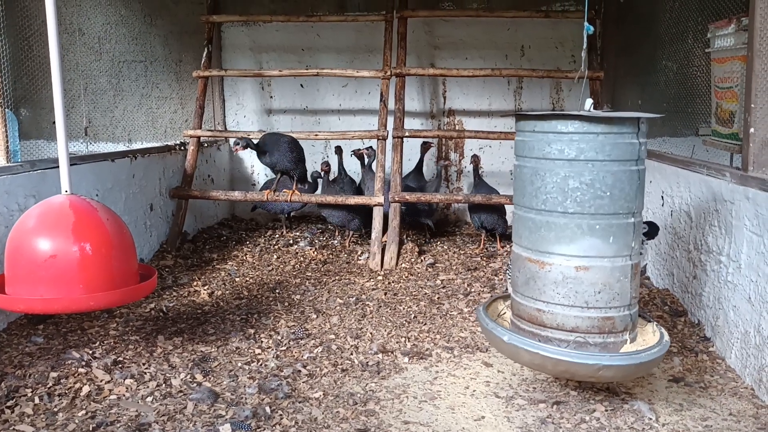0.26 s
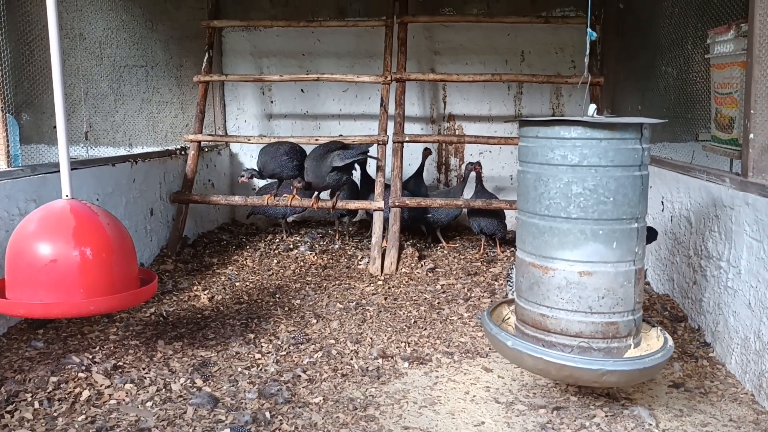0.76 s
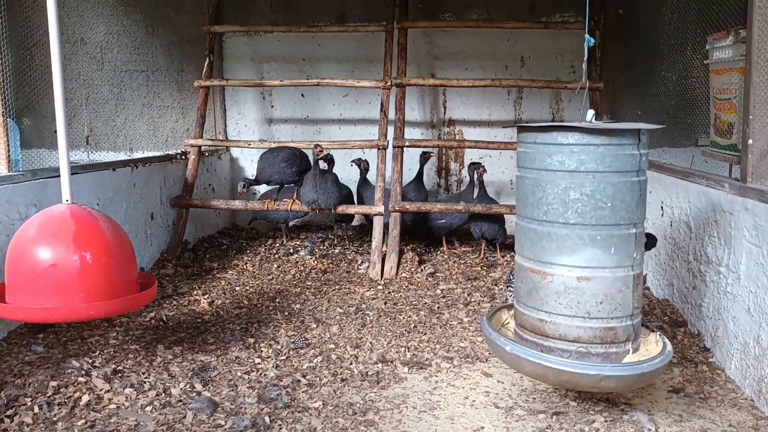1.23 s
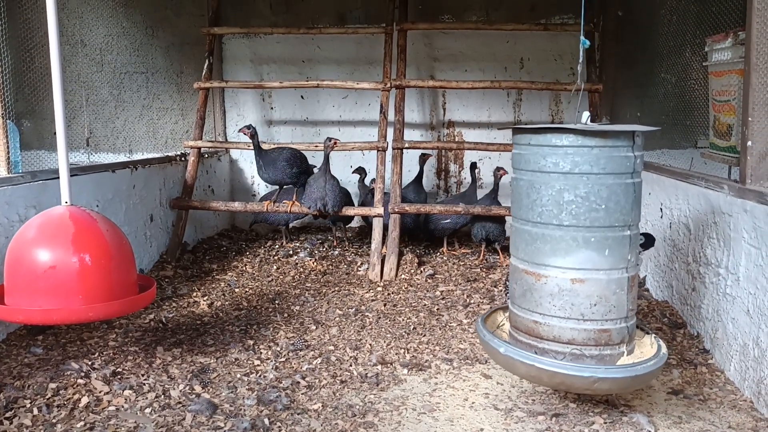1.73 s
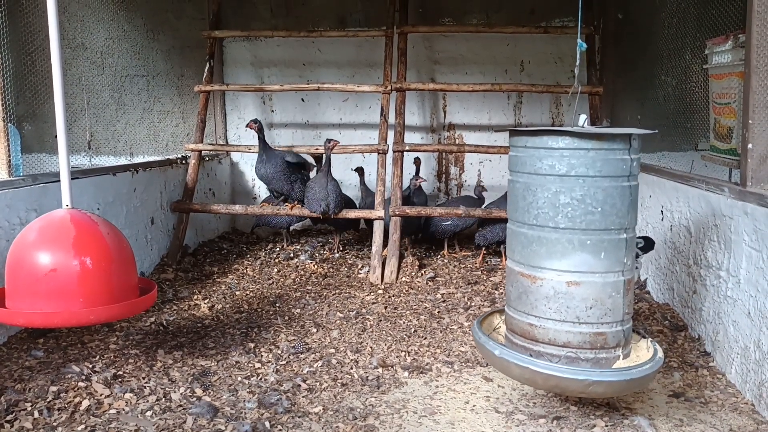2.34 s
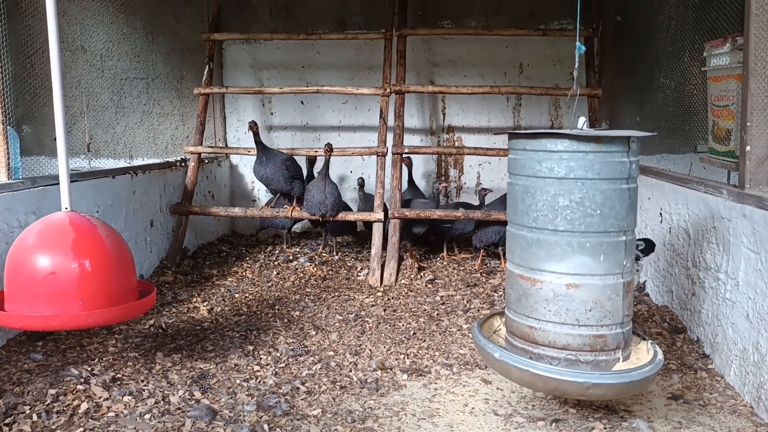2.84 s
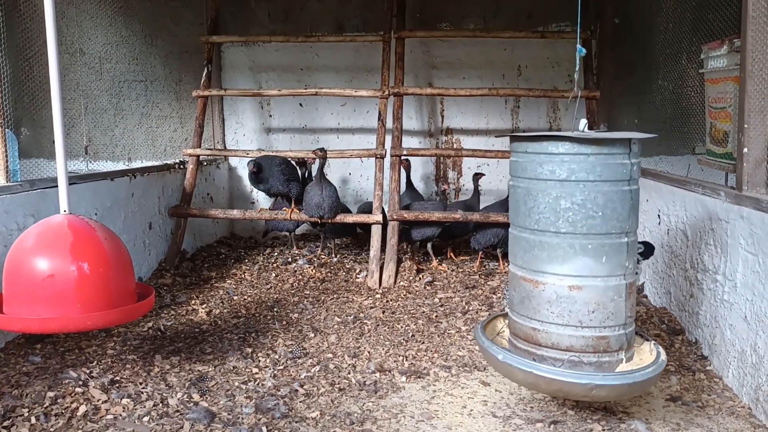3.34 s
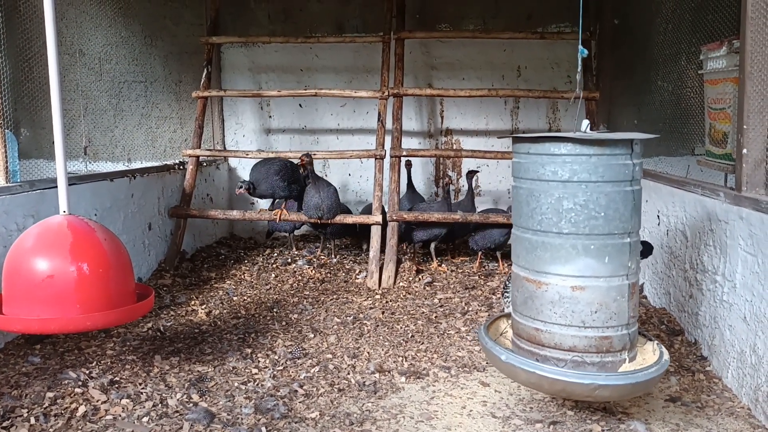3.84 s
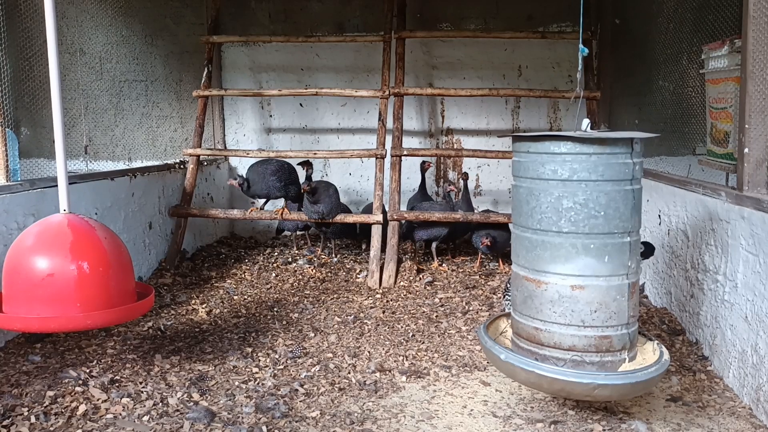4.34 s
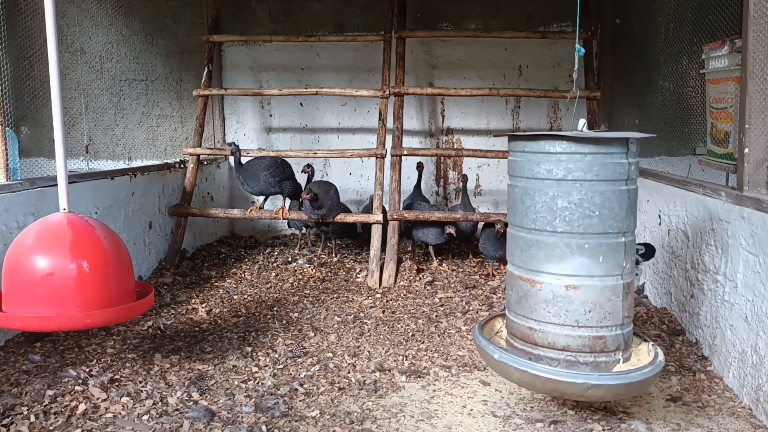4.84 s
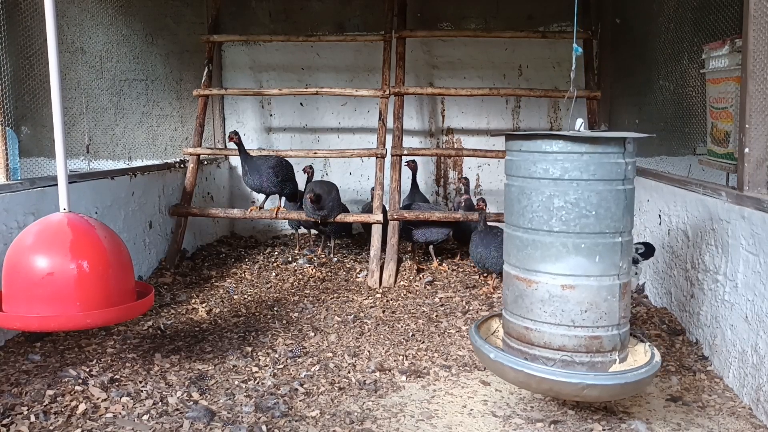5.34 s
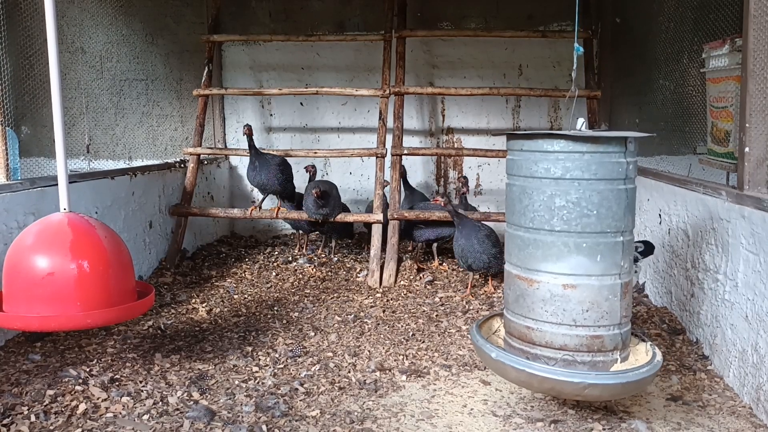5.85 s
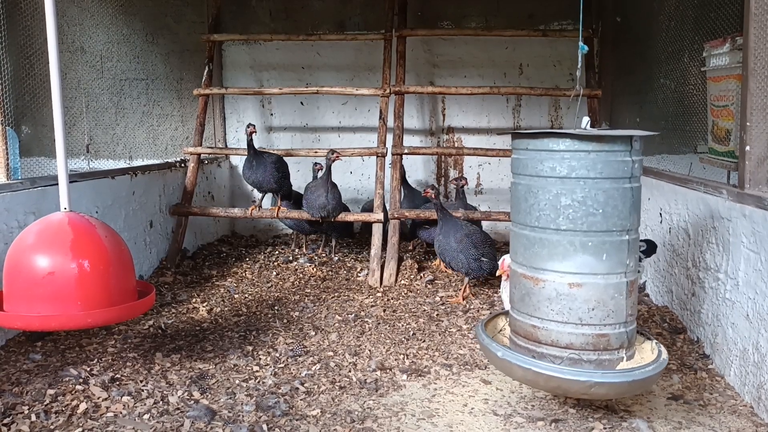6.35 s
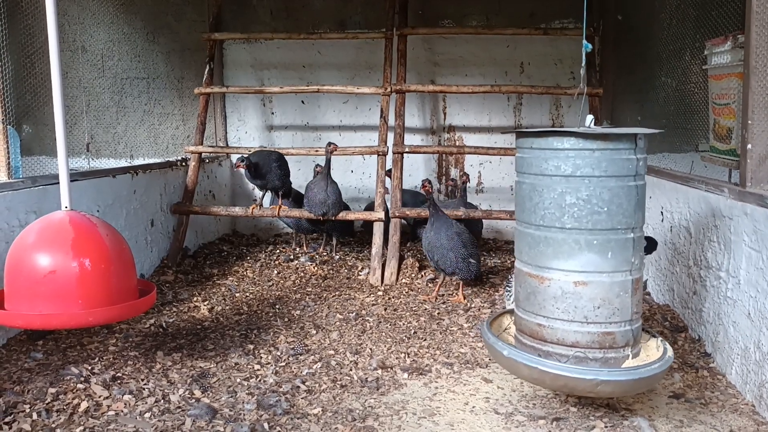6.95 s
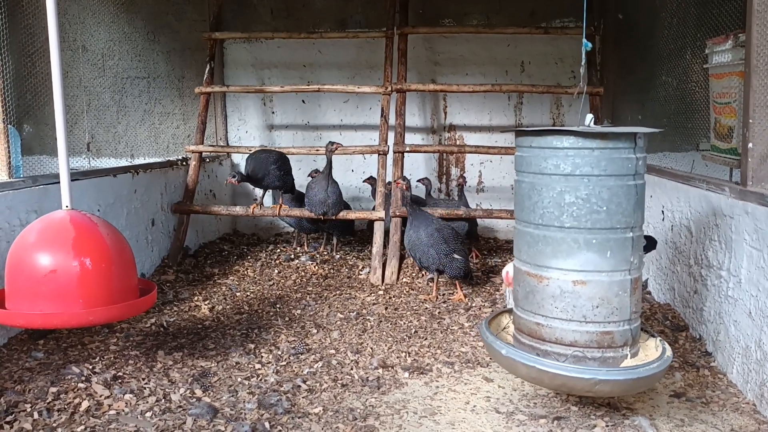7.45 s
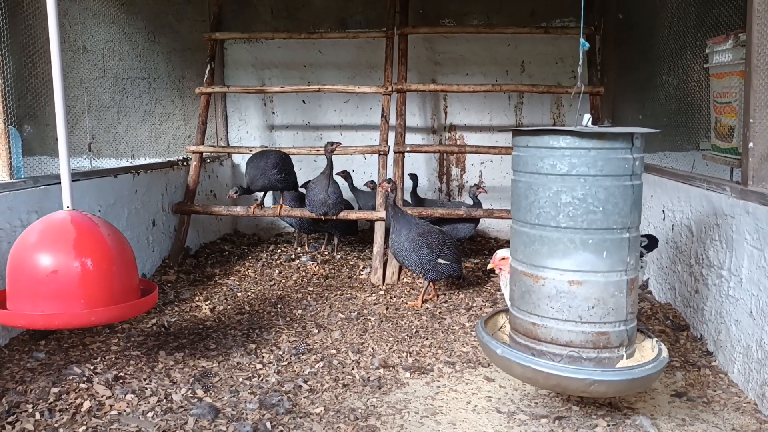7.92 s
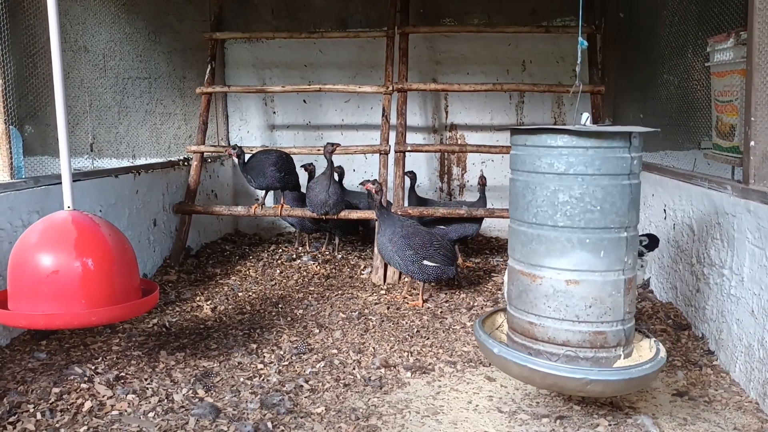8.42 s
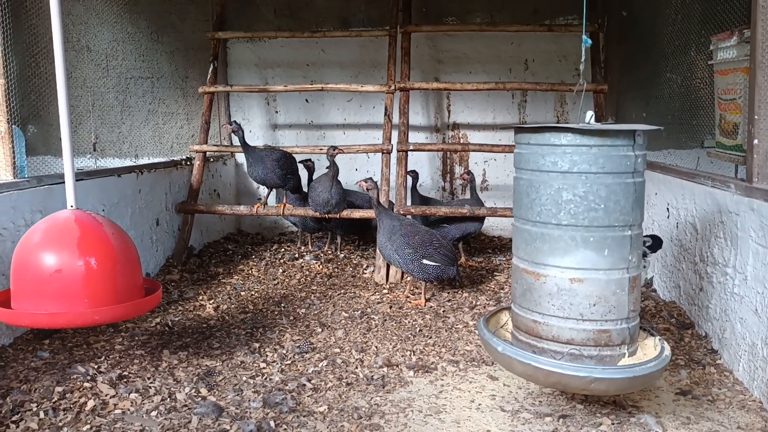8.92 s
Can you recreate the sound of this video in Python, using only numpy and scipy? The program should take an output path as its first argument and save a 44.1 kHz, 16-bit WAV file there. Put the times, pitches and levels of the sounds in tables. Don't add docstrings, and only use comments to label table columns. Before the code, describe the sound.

A flock of guineafowl rattles harsh, fast, overlapping calls in a small concrete shed, then stops, leaving a hen's soft clucks and thin bird peeps.

```python
import sys
import numpy as np
from scipy import signal
from scipy.fft import rfft, irfft, next_fast_len
from scipy.io import wavfile
from scipy.ndimage import uniform_filter1d, minimum_filter1d, map_coordinates

SR = 44100
rng = np.random.default_rng(int(sys.argv[2]) if len(sys.argv) > 2 else 0)


def boost_factor(decibels):
    exponent = np.asarray(decibels, float) / 20
    return 10 ** exponent


def store_wav(level_fs):
    pcm = np.round(np.clip(np.atleast_2d(level_fs), -1, 1) * 32767)
    wavfile.write(sys.argv[1], SR, pcm.T.astype(np.int16))


N = 404838
T = np.arange(N) / SR

# start_s [s], pitch_hz [Hz], fundamental_db [dB]
FLOCK_PITCH = [(0.0, 345.1, -46.5), (.6, 328.4, -50.5), (1.3, 336, -45), (1.75, 332.1, -49),
               (2.33, 331.6, -46.5), (2.47, 305.7, -45.5), (2.7, 324.3, -50.5), (3.5, 322.2, -49),
               (3.95, 338.7, -55.5), (4.1, 331.9, -56), (4.3, 337, -46.5), (4.45, 363.2, -40.5),
               (4.85, 360.9, -46), (5.2, 337.1, -44.5), (5.6, 341.2, -46), (7.9, 325.6, -48),
               (8.15, 316.1, -38), (8.35, 319, -70)]
# start_s [s], rasp_length_s [s], rasp_db [dB], whistle_db [dB], whistle_hz [Hz]
NEAR_CALLS = [(0.07, 0.048, -22, -37, 2550), (0.208, 0.12, -26.5, -32, 2940),
              (0.414, 0.1, -25.5, -21, 2660), (0.689, 0.09, -35, -17.5, 2430),
              (0.883, 0.05, -24.5, -18.5, 2448), (1.052, 0.028, -28.5, -30, 3040),
              (1.199, 0.12, -22, -15, 2800), (1.396, 0.046, -24, -22, 2430),
              (1.577, 0.037, -21.5, -15.5, 2410), (1.704, 0.32, -25, -19, 2710),
              (2.582, 0.096, -18, -18, 2950), (2.773, 0.107, -22, -26, 2240),
              (3.008, 0.069, -22.5, -34, 2134), (3.258, 0.074, -23.5, -19, 2080),
              (3.427, 0.046, -28, -18, 2516), (3.566, 0.1, -19.5, -14, 2515),
              (3.839, 0.13, -25.5, -45, 2388),
              (4.182, 0.089, -23.5, -23, 2250), (4.42, 0.042, -21.5, -19, 2287),
                (4.559, 0.085, -23.5, -21, 2212), (4.713, 0.044, -21.5, -22, 2180),
                (4.865, 0.12, -27, -15.5, 2617), (5.105, 0.043, -24.5, -15.5, 2558),
                (5.27, 0.051, -22.5, -17.5, 2355), (5.374, 0.22, -24, -23, 2560),
                (6.096, 0.096, -21.5, -23, 2523), (6.31, 0.074, -20, -23, 2556),
                (6.653, 0.052, -19.5, -26, 2750), (6.965, 0.09, -21, -19, 2477),
                (7.193, 0.049, -22, -25, 3140), (7.357, 0.038, -24.5, -21, 2514),
                (7.576, 0.056, -21, -26, 2550), (7.803, 0.027, -24.5, -23, 3040),
                (8.114, 0.045, -24.5, -39, 2454)]
CALLS = np.array(NEAR_CALLS)
# start_s [s], length_s [s], level_db [dB], hiss_db [dB]
NEIGHBOURS = [(0.0, 0.0071, -14.5, -19.5), (0.287, 0.07, -28.5, -18.5), (0.565, 0.16, -29.5, -17.5),
              (1.073, 0.018, -33, -2), (1.109, 0.031, -27, -17.5), (2.052, 0.25, -28.5, -11.5),
              (2.304, 0.041, -24, -15.5), (2.402, 0.045, -20, -14.5), (2.899, 0.035, -23, -15.5),
              (3.094, 0.044, -27, -19.5), (3.178, 0.038, -24.5, -14.5), (3.967, 0.039, -36.5, -2.5),
              (5.635, 0.18, -26, -17), (5.847, 0.0435, -23, -16.5), (6.513, 0.074, -21, -15.5),
              (6.756, 0.07, -19.5, -14.5), (7.66, 0.034, -35.5, -13)]
ATTACK_S = 0.0025


def unit(x):
    return x / np.sqrt(np.mean(x ** 2) + 1e-20)


def along(points, hz):
    f, v = np.transpose(points)
    return np.interp(np.log(hz + 1), np.log(f + 1), v)


def curves(rows):
    s, *cols = np.transpose(rows)
    return [np.interp(T, s, c) for c in cols]


def gate(start, length, rise, fall):
    return np.clip((T - start) / rise, 0, 1) * np.clip((start + length - T) / fall + 1, 0, 1)


def wobble(rate):
    return map_coordinates(rng.standard_normal(int(N * rate / SR) + 4), [T * rate])


def filtered(x, response):
    m = next_fast_len(N + 8192)
    return irfft(rfft(x, m) * response(np.fft.rfftfreq(m, 1 / SR)), m)[..., :N]


def tones(tables, overtones_db):
    out = np.zeros(N)
    for rows in tables:
        hz, *levels = curves(rows)
        turn = 2 * np.pi * np.cumsum(hz * (1 + 0.022 * wobble(60))) / SR
        levels += [levels[-1] + db for db in overtones_db]
        voice = sum(boost_factor(db) * np.sin((k + 1) * turn) for k, db in enumerate(levels))
        out += np.sqrt(2) * voice * gate(rows[0][0], rows[-1][0] - rows[0][0], 0.0088, 0.0023)
    return out


def near_birds():
    # hz [Hz], level_db [dB]
    beak = [(470, -63), (800, -27.5), (952, -15.5), (1540, -4.5), (1960, -13.5), (2540, -9), (3380, -6.5),
            (4380, -7.5), (5480, -21), (9600, -22), (12000, -32.5), (15600, -37)]
    hiss_split_hz, lead_s = 5500, 0.0058
    voice = filtered(syrinx(pitch(), rasp=0.45, jitter=0.018), lambda hz: boost_factor(along(beak, hz)))
    low_voice = filtered(voice, lambda hz: hz < hiss_split_hz)
    closing_hz = opening() + 550 * np.exp(-since_onset() / 0.03)
    body = restless(mouth(low_voice, closing_hz, width_hz=170, lift_db=12.5), patchy_db=2.6)
    breath = syrinx(pitch(), rasp=0.6, jitter=0.03)
    hiss = filtered(breath, lambda hz: boost_factor(along(beak, hz)) * (hz >= hiss_split_hz))
    hiss = restless(hiss, patchy_db=3.5)

    effort, airy = np.zeros(N), np.zeros(N)
    own_notes = [(s, length, db, -14) for s, length, db in CALLS[:, :3]]
    for s, length, db, hiss_db in own_notes + NEIGHBOURS:
        growth_db = 2 * 0.18 / length * np.clip((T - s) / length - 0.25, -1, 1)
        note = gate(s - lead_s, length, ATTACK_S, 0.00287) * boost_factor(db + 3.5 + growth_db)
        spit = 1 + 0.9 * np.exp(-np.abs(T - s + lead_s) / 0.012)
        effort += note
        airy += note * boost_factor(hiss_db - 0.4) * spit
    return (effort * body + airy * hiss) * clumps()


def syrinx(pitch_hz, rasp, jitter):
    cycles = np.cumsum(pitch_hz * (1 + jitter * wobble(120))) / SR
    pulses = np.diff(np.floor(cycles), prepend=0) * boost_factor(2.5 * wobble(250))
    breath = rng.standard_normal(N) * (0.88 + np.cos(2 * np.pi * cycles))
    rasp = np.clip(rasp, 0, 1)
    return np.sqrt(1 - rasp) * unit(pulses) + np.sqrt(rasp) * unit(breath)


def since_onset(answers=False):
    starts = np.sort(np.r_[-1, CALLS[:, 0], np.transpose(NEIGHBOURS)[0] if answers else []])
    return T - starts[np.searchsorted(starts, T) - 1]


def pitch():
    tension = 0.12 * np.exp(-since_onset() / 0.04)
    return curves(FLOCK_PITCH)[0] * (0.97 + tension + 0.02 * wobble(10))


def opening():
    # start_s [s], open_hz [Hz], closing_s [s]
    mouths = [(0.0, 1890, 0.15), (.205, 1925, 0.45), (.415, 2070, 0.093), (.56, 2025, 0.4),
              (.69, 1870, 0.19), (0.884, 2100, 0.033), (1.06, 2080, 0.14), (1.2, 2330, 0.082),
              (1.395, 2030, 0.083), (1.58, 1970, 0.098), (1.704, 2067, 0.76), (1.93, 1710, 0.43),
              (2.04, 2080, .12), (2.2, 1730, 0.78), (2.391, 1975, 0.57), (2.583, 1954, 0.18),
              (2.777, 2060, 0.087), (2.899, 2110, 0.13), (3.009, 2200, 0.037), (3.179, 1837, 0.32),
              (3.369, 1590, 0.54), (3.461, 1930, 0.056), (3.57, 1697, .2), (3.621, 2150, 0.052),
              (3.84, 2000, 0.17), (3.949, 2080, 0.58), (4.184, 1910, 0.12), (4.3, 1727, 0.16),
              (4.416, 2270, 0.03), (4.561, 2260, 0.048), (4.717, 2030, 0.12), (4.868, 1960, 0.09),
              (5.107, 2068, 0.11), (5.273, 1998, 0.046), (5.38, 2020, 1.3), (5.74, 1948, 0.041),
              (5.851, 1864, 0.088), (6.094, 2040, 0.26), (6.309, 2000, 0.081), (6.4, 1725, 0.77),
              (6.521, 1801, 0.19), (6.58, 1940, 0.58), (6.66, 2170, 0.66), (6.78, 2012, 0.055),
              (6.964, 2070, 0.47), (7.192, 2050, 0.041), (7.36, 1920, 0.079), (7.576, 1940, 0.73),
              (8.117, 2130, 0.27)]
    closed_hz = 1480
    starts, open_hz, closing_s = np.transpose(mouths)
    latest = np.clip(np.searchsorted(starts, T) - 1, 0, None)
    openness = np.exp(-((T - starts[latest]) / closing_s[latest]) ** 2)
    return closed_hz + (open_hz[latest] - closed_hz) * openness


def mouth(x, centre_hz, width_hz, lift_db):
    hz, t, z = signal.stft(x, SR, nperseg=512)
    offset = (hz[:, None] - np.interp(t, T, centre_hz)) / width_hz
    z = z * (1 + boost_factor(lift_db) / (1 + offset ** 2))
    return signal.istft(z, SR, nperseg=512)[1][:N]


def restless(x, patchy_db):
    z = signal.stft(x, nperseg=512)[2]
    field = uniform_filter1d(rng.standard_normal(z.shape), size=3, axis=0)
    field = uniform_filter1d(field, size=5, axis=1)
    return unit(signal.istft(z * boost_factor(patchy_db * unit(field)), nperseg=512)[1][:N])


def clumps():
    return unit(boost_factor(3 * wobble(140)))


def cheks():
    out, t = np.zeros(N + SR), np.arange(SR // 8) / SR
    shake = wobble(300)
    chop = np.cos(2 * np.pi * np.cumsum(2.3 * curves(FLOCK_PITCH)[0]) / SR)
    unrest = np.clip(t / 0.03, 0, 1)
    for s, db, hz in CALLS[:, [0, 3, 4]]:
        at = max(round((s - 0.004) * SR), 0)
        drop = 0.43 * np.exp(-(t / 0.037) ** 1.9)
        sinking_hz = hz * (0.67 + drop + 0.032 * unrest * shake[at:][:len(t)])
        swell = (1 - np.exp(-t / 0.004)) * boost_factor(db + 0.3 - 60 * t / 0.17)
        swell = swell * (1 + 0.7 * unrest * chop[at:][:len(t)])
        turn = 2 * np.pi * np.cumsum(sinking_hz) / SR
        out[at:][:len(t)] += swell * (np.sin(turn) + boost_factor(-17.5) * np.sin(2 * turn))
    return out[:N]


def buzzes():
    # start_s [s], pitch_hz [Hz], level_db [dB]
    buzz_starts = [(0.207, 490, -23.5), (.416, 520, -24), (0.887, 491, -24), (1.392, 496, -26.5),
                   (1.579, 485, -53), (3.567, 480, -34), (1.059, 511, -36), (1.197, 542, -36),
                   (1.704, 568, -28), (4.415, 545, -36), (4.562, 528, -27), (4.717, 545, -36),
                   (4.868, 521, -29), (5.109, 520, -35), (6.094, 504, -26.5), (6.308, 508.7, -24.5),
                   (6.962, 509.7, -25), (7.19, 503, -23.5), (7.357, 503, -26), (7.574, 504, -22),
                   (7.799, 504, -23), (8.112, 492.3, -26)]
    partials_db = [6, 2, 3.5, 1, -22]
    out, t = np.zeros(N + SR), np.arange(SR // 10) / SR
    for s, hz, db in buzz_starts:
        luck = rng.standard_normal(10)
        turn = 2 * np.pi * hz * (t - 0.25 * t ** 2)
        stack = sum(boost_factor(level + 2.5 * luck[k]) * np.sin((k + 3) * turn + 2 * luck[k + 5])
                    for k, level in enumerate(partials_db))
        out[round(s * SR):][:len(t)] += stack * (1 - np.exp(-t / 0.0018)) * boost_factor(db - 60 * t / 0.13)
    return out[:N]


def drones():
    # time_s [s], pitch_hz [Hz], level_db [dB]
    held_rattles = [
        [(1.72, 335.3, -26.5), (1.85, 322, -33), (1.97, 325.2, -25.5), (2.1, 323.3, -27.5), (2.25, 314.6, -32),
         (2.4, 305, -31)],
        [(5.38, 334.4, -33), (5.46, 333, -39), (5.6, 329.4, -51), (5.72, 334.3, -42)],
        [(5.74, 316, -28), (5.82, 299, -38), (5.93, 290.6, -36)],
    ]
    partials_db = [-4, -1, -4, -5, -10, -14, -18]
    out = np.zeros(N)
    for rows in held_rattles:
        hz, db = curves(rows)
        turn = 2 * np.pi * np.cumsum(hz * (1 + 0.009 * wobble(40))) / SR
        stack = sum(boost_factor(level + 4.6 * wobble(25)) * np.sin((k + 3) * turn + k * k)
                    for k, level in enumerate(partials_db))
        out += stack * boost_factor(db - 5.0) * gate(rows[0][0], rows[-1][0] - rows[0][0], 0.013, 0.018)
    return out


def squeaks():
    # time_s [s], pitch_hz [Hz], level_db [dB], second_partial_db [dB]
    glides = [
        [(1.046, 3050, -21, -38), (1.058, 3020, -23, -26), (1.068, 3030, -29, -35)],
        [(1.066, 1106, -30, -23), (1.085, 1093, -28, -31), (1.11, 1093, -32, -18.5)],
        [(3.19, 1018, -44, -16), (3.208, 992, -20, -19), (3.26, 1020, -73, -40)],
        [(3.965, 1107, -34, -18.5), (4.03, 1039, -35.5, -25), (4.065, 1010, -41, -52), (4.1, 1017, -47, -33.5)],
        [(4.19, 1147, -22, -14), (4.22, 1170, -43, -54), (4.25, 1230, -52, -48)],
    ]
    return tones(glides, [-11, -27])


def sizzle():
    # start_s [s], length_s [s], level_db [dB]
    puffs = [(1.718, 0.74, -50), (2.6, 0.092, -50), (3.081, .08, -43), (3.37, 0.11, -40),
             (3.621, 0.081, -33), (5.299, 0.14, -46), (5.7, 0.23, -53), (3.96, 0.089, -48),
             (4.186, 0.15, -45), (4.42, 0.062, -37), (4.553, 0.15, -38), (4.73, 0.073, -49),
             (4.866, 0.037, -30), (4.927, 0.076, -34)]
    air = filtered(rng.standard_normal(N), lambda hz: 1 / (1 + (11000 / (hz + 1)) ** 10))
    air = restless(air, patchy_db=-6.0)
    return air * sum(gate(s, length, ATTACK_S, 0.012) * boost_factor(db) for s, length, db in puffs)


def flock(db):
    # hz [Hz], level_db [dB]
    throat = [(400, -29.5), (580, -12.5), (720, -24.5), (950, -5), (1300, -0.5), (2200, -3), (3000, -5),
              (5000, -20.5), (15000, -29.5)]
    mouth_hz = opening() + 40 * wobble(14.0)
    voice = filtered(syrinx(pitch(), rasp=0.45, jitter=0.02), lambda hz: boost_factor(along(throat, hz)))
    voice = restless(mouth(voice, mouth_hz, width_hz=140, lift_db=14.5), patchy_db=2.8)
    return boost_factor(db - 7.5) * voice * clumps()


def flock_effort():
    # time_s [s], swell_s [s], hold_s [s], level_db [dB]
    syllables = [(0.0, .02, 0.084, -13), (0.201, 0.0073, 0.1, -8), (0.425, 0.01, 0.17, -16),
                 (0.573, 0.055, 0.034, -21), (0.679, 0.22, 0.1, -16), (0.925, 0.079, 0.016, -11),
                 (1.107, 0.013, 0.23, -15.5), (1.429, 0.038, 0.024, -14.5), (1.603, 0.031, 0.027, -16.5),
                 (1.734, 0.019, 0.19, -16), (1.95, 0.13, 0.055, -19), (2.048, 0.054, 0.052, -10),
                 (2.181, 0.15, 0.15, -12), (2.42, 0.065, 0.0083, -14), (2.639, 0.097, 0.02, -7.5),
                 (2.8, 0.12, 0.034, -12.5), (3.132, 0.38, 0.022, -15.5), (3.36, 0.24, 0.1, -12.5),
                 (3.623, 0.1, 0.074, -14.5), (3.853, 0.026, 0.073, -11), (4.159, 0.012, 0.01, -24),
                 (4.184, 0.013, 0.13, -12), (4.422, 0.032, 0.023, -15.5), (4.573, 0.013, 0.19, -14.5),
                 (4.88, 0.01, 0.058, -15.5), (4.995, 0.17, 0.011, -11), (5.135, 0.043, 0.034, -13.5),
                 (5.295, 0.016, 0.034, -13), (5.416, 0.065, 0.2824, -15.5), (5.77, 0.17, 0.056, -10),
                 (5.893, 0.077, 0.03, -16), (6.126, 0.049, 0.04, -11), (6.324, 0.011, 0.17, -13),
                 (6.453, 0.089, 0.06, -17), (6.556, 0.096, 0.067, -16), (6.84, 0.19, 0.0085, -10),
                 (7.05, 0.18, 0.026, -12), (7.206, 0.011, 0.035, -11.5), (7.26, 0.079, 0.054, -17),
                 (7.371, 0.017, 0.034, -11), (7.569, 0.021, 0.055, -10.5), (7.825, 0.039, 0.012, -10.5),
                 (8.114, 0.02, 0.023, -12)]
    swell_db, release_db_per_s = 24.5, 238
    shapes = []
    for s, swell, hold, db in syllables:
        rise_db = swell_db * np.clip((s - T) / swell, 0, None)
        fall_db = release_db_per_s * np.clip(T - s - hold, 0, None)
        shapes.append(db - rise_db - fall_db)
    return np.maximum(np.max(shapes, axis=0), -70) + 3.1 * wobble(13)


def chests(db):
    since = since_onset(answers=True)
    pitch_hz, low_db = curves(FLOCK_PITCH)
    pitch_hz = pitch_hz * (0.95 + 0.32 * np.exp(-since / 0.04))
    follow_db = 0.24 * (db + 26.0)
    push_db = 11 * np.exp(-((since - 0.035) / 0.036) ** 2)
    low_db = low_db - 3 + follow_db - 3.0 + push_db

    def chest(ratio):
        turn = 2 * np.pi * np.cumsum(ratio * pitch_hz * (1 + 0.04 * wobble(40))) / SR
        return np.sin(turn) * boost_factor(3 * wobble(30))

    both = boost_factor(low_db - 2.5) * chest(0.93) + boost_factor(-64.0) * chest(0.75)
    return both * gate(-1.07, 9.3, 0.01, 0.029)


def thumps():
    # start_s [s], peak_db [dB]
    gulps = [(0.144, -42), (0.769, -45), (0.859, -38), (0.98, -39), (1.171, -54), (1.364, -50),
             (1.477, -42), (3.506, -40), (3.831, -43), (4.156, -38), (4.35, -40), (4.487, -40),
             (4.541, -36), (4.842, -42), (4.916, -55), (5.171, -44)]
    out, t = np.zeros(N + SR), np.arange(SR // 20) / SR
    push = (1 - np.exp(-t / 0.0025)) * np.sin(2 * np.pi * 226 * (t - 6 * t ** 2))
    for s, db in gulps:
        out[round(s * SR):][:len(t)] += boost_factor(db - 1.5 - 60 * t / 0.037) * push
    return out[:N]


def hen():
    # start_s [s], peak_db [dB], length_s [s], pitch_hz [Hz], rasp [0-1]
    clucks = [
        (7.122, -32, 0.036, 333, 0.88),
        (7.551, -26, 0.032, 293.5, 0.6),
        (7.76, -26.5, 0.021, 301, 0.45),
        (8.054, -24.5, 0.033, 388.3, 0.57),
        (8.171, -20.5, 0.047, 300.8, 0.35),
        (8.318, -23, 0.052, 299.3, 0.82),
        (8.416, -15, 0.045, 303.4, 0.95),
        (8.566, -18.5, 0.039, 262.3, 0.73),
        (8.744, -22.5, 0.044, 270, 0.8),
        (8.926, -24.5, 0.033, 383.8, 0.6),
    ]
    # centre_hz [Hz], width_hz [Hz], level_db [dB]
    modes = [(817, 190, 4.5), (1410, 550, 1.5), (2800, 2730, -5), (4600, 7800, -16.5), (9060, 2170, -15.5)]
    # time_s [s], pitch_hz [Hz], level_db [dB]
    whine = [
        [(7.24, 750.4, -44), (7.282, 785, -36.5), (7.45, 810.6, -43.5)],
    ]
    rough, clear = np.zeros(N), np.zeros(N)
    for s, db, length, pitch_hz, rasp in clucks:
        puff = gate(s, length * 0.4, length * 0.35, length * 0.6) * boost_factor(db)
        puff = puff * syrinx(pitch_hz, rasp, jitter=0.04 * rasp)
        clear += puff
        rough += puff * boost_factor(-11.5 + 12.5 * rasp)

    def ring(chosen):
        return lambda f: sum((-1) ** k * boost_factor(db) * 1j * f * w / (c * c - f * f + 1j * f * w)
                             for k, (c, w, db) in enumerate(chosen))

    cluck = boost_factor(12.0) * filtered(clear, ring(modes[:2])) + boost_factor(12.5) * filtered(rough, ring(modes[2:]))
    cluck = filtered(cluck, lambda hz: 1 / (1 + (770 / (hz + 1)) ** 10) / (1 + (hz / 9000) ** 2))
    return cluck + tones(whine, [-15])


def coo():
    # time_s [s], pitch_hz [Hz], fundamental_db [dB], second_partial_db [dB]
    last_cluck = [
        [(8.935, 391, -58, -44), (8.955, 378, -49, -28.5), (8.975, 386, -54, -43), (8.99, 388, -68, -49)],
    ]
    return tones(last_cluck, [0, -6, -24])


def small_bird():
    # time_s [s], pitch_hz [Hz], level_db [dB]
    peeps = [
        [(8.0, 2600, -49), (8.05, 3000, -45)],
        [(8.68, 2700, -51), (8.75, 2650, -49)],
        [(8.8, 3300, -48), (8.89, 3250, -55)],
        [(8.9, 3300, -54), (8.93, 3550, -48), (8.97, 3400, -48), (9.0, 3250, -45), (9.015, 2650, -48),
         (9.04, 2500, -50), (9.09, 2550, -57)],
        [(9.135, 2850, -50), (9.155, 3000, -45), (9.18, 2900, -48)],
        [(9.14, 3450, -53), (9.18, 3400, -51)],
    ]
    return 0.84 * tones(peeps, [-25])


def tick():
    t = np.clip(T - 9.076, 0, None)
    knock = boost_factor(-29 - 60 * t / 0.0025) * np.sin(2 * np.pi * 750 * t)
    edge = boost_factor(-31 - 60 * t / 0.0006) * np.sin(2 * np.pi * 8000 * t)
    return knock + edge


def shed(x):
    # hz [Hz], t60_s [s]
    walls = [(300, 1), (900, 0.33), (2000, 0.23), (4000, 0.23), (12000, 0.1)]
    out, step = np.zeros((2, N + SR)), SR // 8
    padded = np.pad(x, (step, 2 * step))
    for at in range(-step, N, step):
        hz, t, z = signal.stft(rng.standard_normal((2, SR // 3)), SR, nperseg=256)
        decay = boost_factor(-60 * t / along(walls, hz)[:, None])
        tail = signal.istft(z * decay, SR, nperseg=256)[1]
        piece = (padded[at + step:at + 3 * step] * np.hanning(2 * step))[max(-at, 0):]
        wet = signal.fftconvolve(piece[None], tail / np.linalg.norm(tail[0]), axes=1)
        start = max(at, 0) + 60
        wet = wet[:, :N + SR - start]
        out[:, start:start + wet.shape[1]] += wet
    return spread(out[:, :N])


def spread(pair):
    # hz [Hz], likeness [0-1]
    alike = [(60, 0.34), (300, 0.62), (700, 0.22), (2000, 0.0037), (12000, 0.0075)]
    turn = lambda hz: np.arccos(np.clip(along(alike, hz), -1, 1)) / 2
    mid, side = filtered(pair, lambda hz: np.array([np.cos(turn(hz)), np.sin(turn(hz))]))
    return np.array([mid + side, mid - side])


def background(birds):
    # hz [Hz], level_db [dB]
    air_colour = [(25, -25), (80, 3), (160, 3), (300, 6.5), (600, 3), (1500, 0), (4000, -8.5),
                  (15700, -29.5)]
    # time_s [s], level_db [dB]
    engine_level = [(0.0, -80), (1.94, -82), (2.12, -65), (3.32, -69), (3.53, -60.5), (4.78, -55),
                    (5.88, -65), (6.03, -61), (6.98, -70), (8.08, -65), (8.44, -70), (9.0, -67),
                    (9.18, -79)]
    air = filtered(spread(rng.standard_normal((2, N))), lambda hz: boost_factor(along(air_colour, hz)))
    air = boost_factor(-47.5) * unit(air)
    hum = np.sin(2 * np.pi * np.cumsum(79 + 1.0 * wobble(2.05)) / SR)
    engine = boost_factor(curves(engine_level)[0] + 8.5) * hum
    loud = np.sqrt(np.abs(uniform_filter1d(np.mean(birds ** 2, axis=0), size=900)))
    return (air + engine) / (1 + loud / 0.055)


def scene():
    # hz [Hz], left_over_right_db [dB]
    sides = [(60, 8), (380, 9.5), (2400, 7), (5000, 3.5), (15000, 5.5)]
    # time_s [s], left_over_right_db [dB]
    drift = [(0.0, -0.2), (6.9, 0.3), (7.3, -0.5), (8.8, -0.2), (9.1, -6)]
    lag = 40
    effort_db = flock_effort()
    low = chests(effort_db) + thumps()
    whistles = cheks() + buzzes() + drones() + coo() + squeaks() + tick()
    dry = near_birds() + whistles + flock(effort_db) + hen() + sizzle() + small_bird()

    direct = boost_factor(-8) * filtered(dry, lambda hz: 1 / np.sqrt(1 + (hz / 3300) ** 2))
    direct = direct + boost_factor(-4) * whistles + boost_factor(4) * low
    to_walls = dry + low - (1 - 0.85) * whistles
    birds = direct + boost_factor(-1.5) * shed(to_walls)

    half = np.array([[1], [-1]]) / 2

    def microphones(hz):
        return boost_factor(half * along(sides, hz) + 4) * np.exp(-2j * np.pi * hz * half * lag / SR)

    return filtered(birds * boost_factor(half * curves(drift)[0]) + background(birds), microphones)


def roll_off(x):
    return signal.sosfilt(signal.butter(12, 15710, fs=SR, output="sos"), x)


def record(dry):
    ceiling, limit_samples = 0.85, 400
    needed = np.minimum(1, ceiling / (np.abs(dry).max(axis=0) + 1e-9))
    gain = uniform_filter1d(minimum_filter1d(needed, size=2 * limit_samples), size=limit_samples)

    def response(hz):
        dip = 1 - 0.55 / (1 + ((hz - 5750) / 330) ** 2)
        return (hz < 15700) / (1 + (45 / (hz + 1)) ** 4) * dip

    return roll_off(filtered(dry * gain, response))


dry = scene()
out = record(dry)
store_wav(out)
```